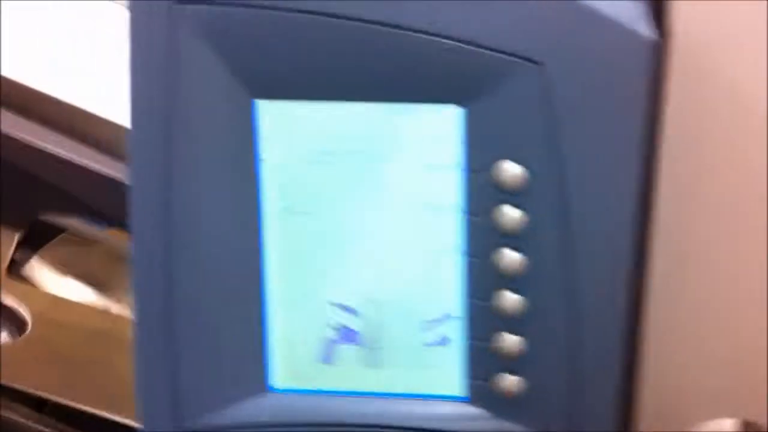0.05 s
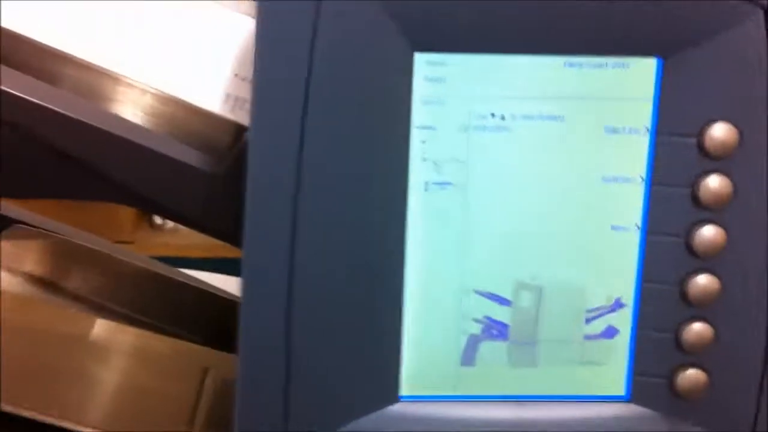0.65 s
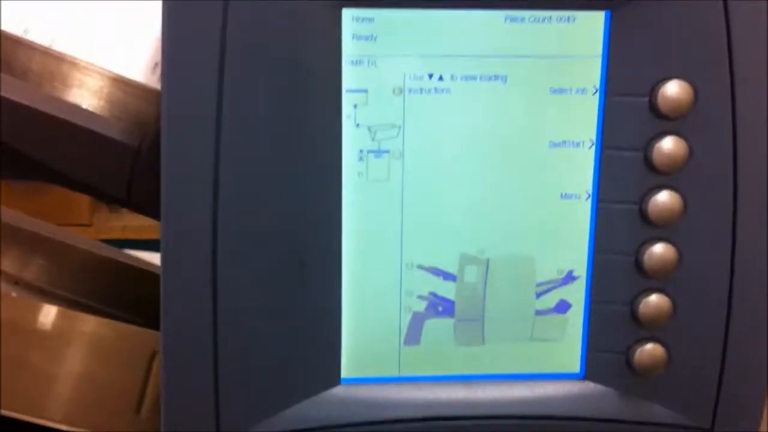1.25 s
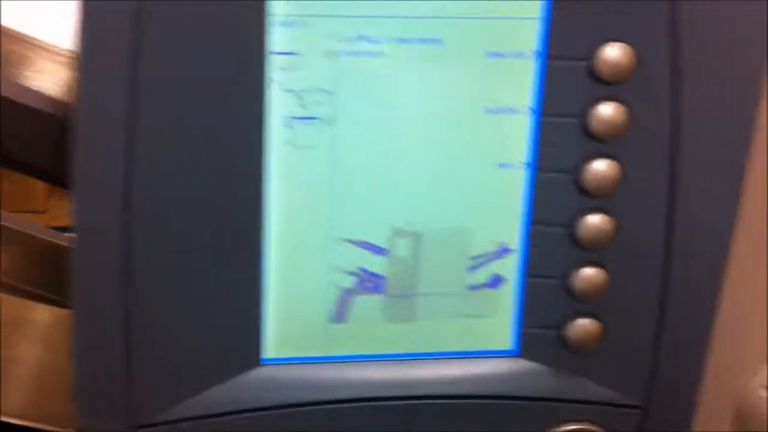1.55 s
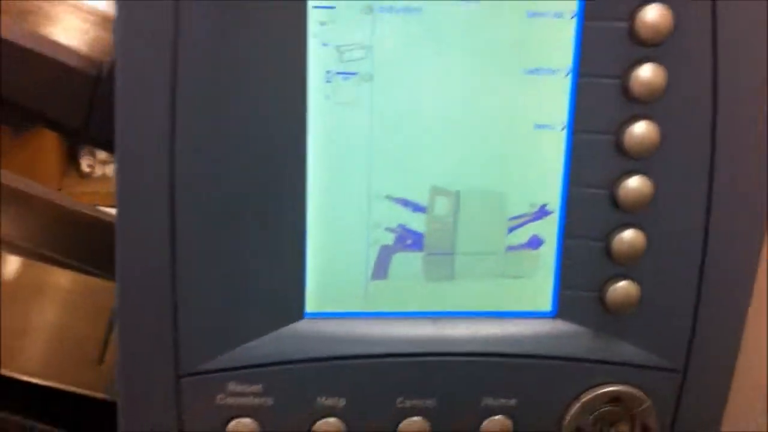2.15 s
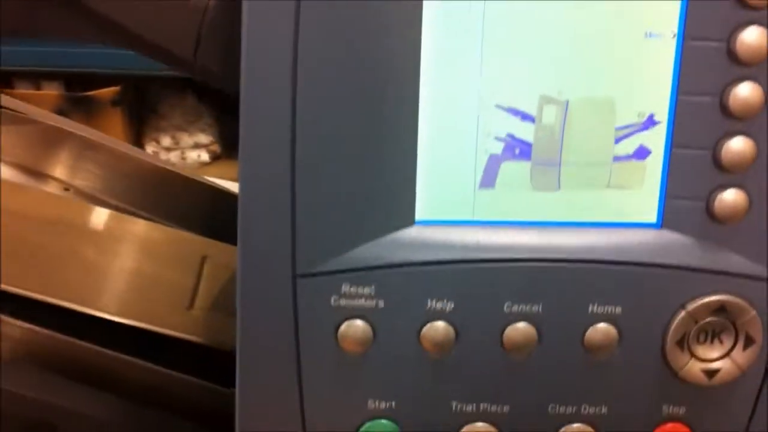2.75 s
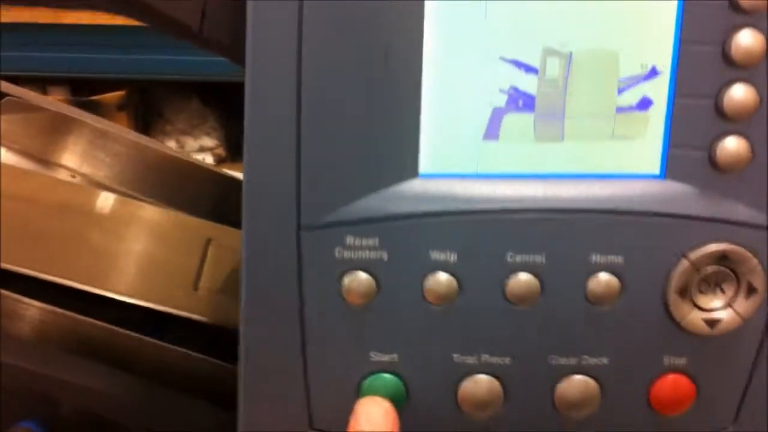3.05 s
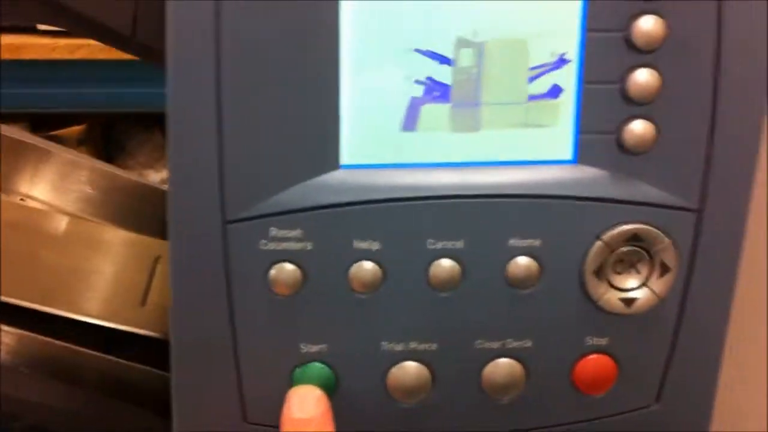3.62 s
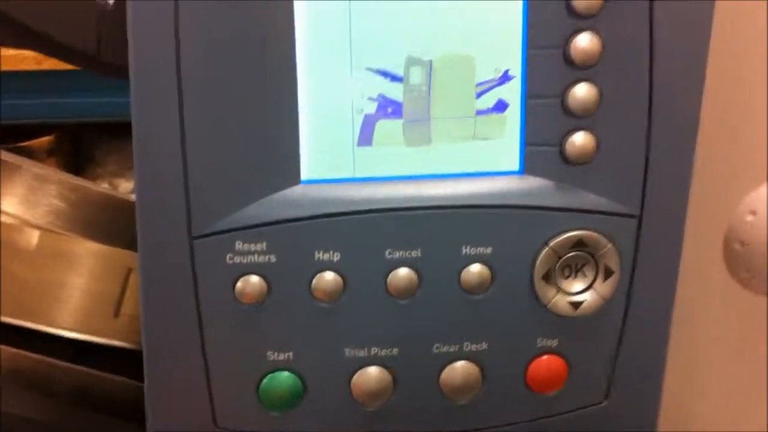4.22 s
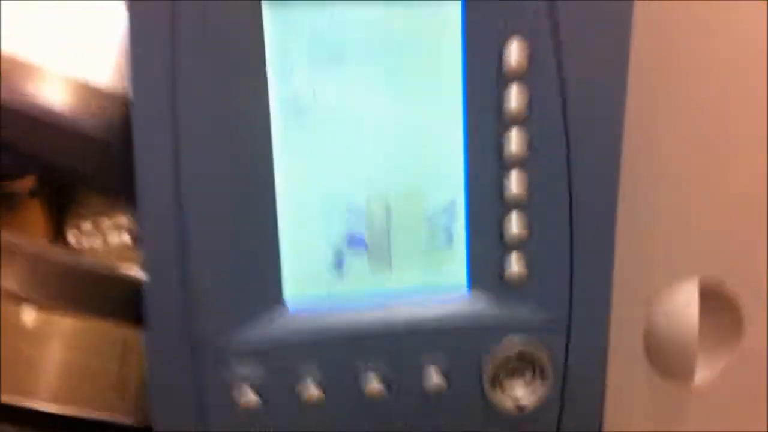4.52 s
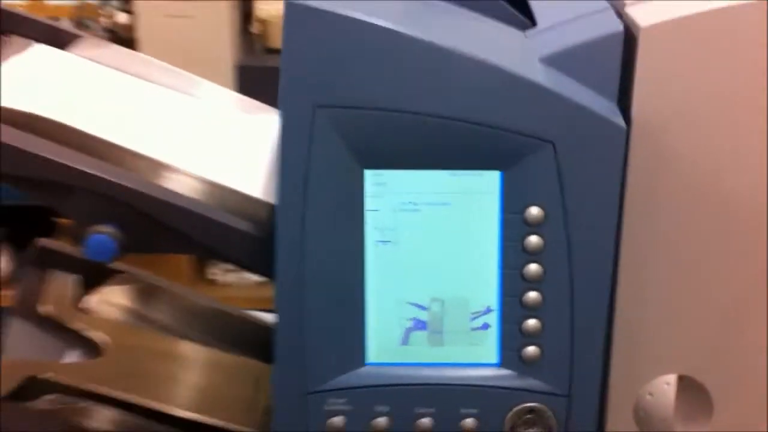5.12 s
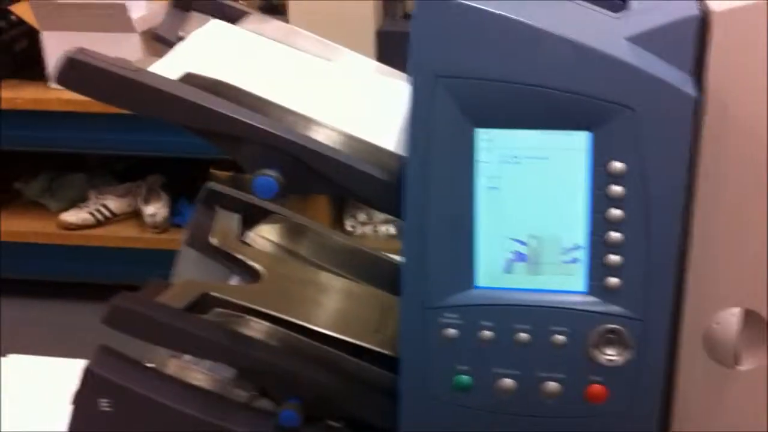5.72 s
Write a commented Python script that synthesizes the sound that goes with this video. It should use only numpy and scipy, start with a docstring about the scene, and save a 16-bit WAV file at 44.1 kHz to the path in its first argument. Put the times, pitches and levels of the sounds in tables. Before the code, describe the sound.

A paper folding machine starts up in a quiet office, its motor rumbling and gears chattering as sheets scrape through with sharp clacks.

```python
"""The motor of a folder inserter hums while its belts and rollers rattle the plastic housing.
Two sets of gears whine and chatter, sheets of paper scrape through the rollers, and the feed
mechanism clacks. It is heard from the control panel, in a quiet office. Before the machine starts
there are light knocks on its casing, tiny clicks, faint brushing and a distant tick,
then the snap of the start button."""
import sys
import numpy as np
from scipy import signal
from scipy.fft import rfft, irfft, next_fast_len
from scipy.io import wavfile
from scipy.ndimage import map_coordinates

SR = 44100
rng = np.random.default_rng(int(sys.argv[2]) if len(sys.argv) > 2 else 0)


def wrap_up_sound(samples):
    """Save the sound to the file named by the first command line argument, as 16-bit audio."""
    columns = np.atleast_2d(samples).T
    # keep every value between -1 and 1, then stretch to whole-number steps
    tamed = np.clip(columns, -1, 1)
    steps = np.round(tamed * 32767).astype(np.int16)
    wavfile.write(sys.argv[1], SR, steps)


N = 254898
T = np.arange(N) / SR  # the time of every sample, in seconds


# The tones of the hum. Each row: multiple of the shaft speed, relative level in dB while a sheet
# is fed in, and while it is carried on.
HUM_TONES = [(7, 0.5, -1.5), (8, 4, -1.5), (9.05, -5, 1.5)]
# How the housing and the rollers ring. Each row: pitch in Hz, width in Hz, relative level in dB.
HOUSING_RING = [(158, 25, -8.5), (204, 28.6, -4), (265.3, 30, -5.5)]
ROLLER_RING = [(324.3, 59, -1.5), (372.6, 46, 2), (433, 55, 0.5), (489, 44, 0), (584, 60, -5.5)]
# The deep noise in the rumble. Each row: frequency in Hz, relative level in dB.
BOOM_SPECTRUM = [(20, -22), (50, -23), (80, -15.5), (130, 1), (250, -3.5), (600, -25)]
# The rollers strain on a sheet in all rows but the last; the last row is a low thump near the end. Each row:
# start and length in # seconds, extra rumble and rattle in dB.
ROLLER_STRAINS = [(3.942, 0.056, 7, 2), (4.079, 0.07, 10, 4), (4.203, .035, 6, 2.5), (4.33, 0.078, 2, 8),
                  (4.458, 0.075, 1.5, 7.5), (4.92, .045, 6, 1), (5.012, 0.13, 8, 6), (5.15, .06, 1.5, 6.5),
                  (5.398, 0.064, 4, 5), (5.745, .08, 8.5, 4)]

def motor(turns, load_db, handover):
    """The motor hums; belts and rollers shake the housing, harder when they strain on a sheet."""
    shake_db = 0.11 * load_db
    rumble_db, rattle_db, hum_db = -40.5 + shake_db, -38 + shake_db, -38.5 + shake_db
    for start, length, extra_rumble_db, extra_rattle_db in ROLLER_STRAINS:
        straining = ramp(start, takes_s=0.031) - ramp(start + length, takes_s=0.031)
        rumble_db = rumble_db + extra_rumble_db * straining
        rattle_db = rattle_db + extra_rattle_db * straining
    hum = np.zeros(N)
    for multiple, feed_db, transport_db in HUM_TONES:
        level_db = feed_db + handover * (transport_db - feed_db)
        hum += amp(level_db) * shaft_tone(turns, multiple, slip=0.78, flutter_db=2)
    drone = shaft_tone(turns, 3.96, slip=1.0, flutter_db=1.5)  # where the housing rings most
    shake = unit(resonate(impacts(1200, spread_db=2), HOUSING_RING))
    boom = unit(coloured(rng.standard_normal(N), BOOM_SPECTRUM))
    rumble = unit(shake + amp(-4.5) * drone + amp(-12.5) * boom)
    throb = amp(1.5 * np.sin(np.pi * turns))  # the rollers turn at half the shaft speed
    rattle = unit(resonate(throb * impacts(1300, spread_db=3), ROLLER_RING))
    return amp(rumble_db) * rumble + amp(rattle_db) * rattle + amp(hum_db) * unit(hum)


HANDOVER_TAKES_S = 0.16  # how long the load takes to shift between the two sets of gears
# How each set of gears rings. Each row: pitch in Hz, width in Hz, relative level in dB.
FEED_GEAR_RING = [(698, 165, -4.5), (879, 138, -0.5), (975, 69, 1), (1072, 127, 0), (1255, 264, -9)]
TRANSPORT_GEAR_RING = [(868, 95, -2.5), (1000, 154, -1), (1146, 76, 1.5), (1277, 153, 2.5), (1370, 61, 4),
                       (1470, 180, -3.5)]

def gears(turns, load_db, handover):
    """Meshing teeth whine and chatter; most of the load shifts from feed gears to transport gears."""
    transport_share = 0.67 * handover
    backlash = amp(1.7 * np.sin(2 * np.pi * turns + wobble(11)))  # the chatter swells once a turn
    feed = unit(resonate(backlash * impacts(1500, spread_db=3), FEED_GEAR_RING))
    transport = unit(resonate(backlash * impacts(1500, spread_db=4), TRANSPORT_GEAR_RING))
    chatter = np.sqrt(1 - transport_share) * feed + np.sqrt(transport_share) * transport
    feed_teeth, transport_teeth = 20, 24
    feed_whine = shaft_tone(turns, feed_teeth, slip=0.64, flutter_db=1)
    transport_whine = handover * shaft_tone(turns, transport_teeth, slip=0.36, flutter_db=3.5)
    sheet_through = ramp(5.15, HANDOVER_TAKES_S)  # the transport gears ease off
    whine = amp(-40 - 2.5 * handover) * feed_whine + amp(-34.5 - 5 * sheet_through) * transport_whine
    return amp(-33.5 + 0.83 * load_db) * chatter + amp(0.5 * load_db) * whine


# Rollers pull a sheet. Each row: time of the peak in seconds, scrape level in dB, crisp edge
# in dB above the scrape, rise and decay in seconds.
SHEET_PULLS = [(3.96, -34, -12, 0.026, .08), (4.074, -31, -7, 0.072, .13), (4.34, -43.5, -1, 0.023, 0.53),
               (4.888, -33.5, -3.5, .01, 0.059), (5.026, -28.5, -5, 0.084, 0.094),
               (5.122, -21, -7.5, 0.015, 0.12), (5.184, -28, 1, 0.014, 0.014),
               (5.286, -31.5, -4, 0.019, .04), (5.38, -34, -7.5, .01, 0.27),
               (5.735, -23.5, -9.5, .055, .25), (5.736, -29, 2.5, .008, 0.027)]
# The scrape, and a crisp edge also used by clacks and clicks.
# Each row: frequency in Hz, relative level in dB.
SCRAPE_SPECTRUM = [(100, -51), (700, -19), (1400, 0), (1900, 0.5), (2700, -2.5), (4000, -5), (6000, -8),
                   (8000, -15), (10000, -14.5), (15000, -47)]
CRISP_SPECTRUM = [(300, -62), (3000, -38), (6000, 2), (8500, 1.5), (10500, -2.5), (12700, 1), (15700, -3.5)]
# Paper squeaks on rubber. Each row: time in seconds, pitch in Hz, level in dB.
PAPER_SQUEAKS = [(4.204, 12600, -37), (4.205, 9700, -40), (5.184, 12800, -25), (5.741, 6330, -22.5)]

def paper(turns):
    """Sheets slip in tiny catches, pressed unevenly by the rollers, and squeak now and then."""
    scrape_power, crisp_power = amp(-42) ** 2, amp(-50) ** 2  # paper gliding between pulls
    for time, db, edge_db, rise, decay in SHEET_PULLS:
        pull = amp(db) * swell(time, rise, decay)
        scrape_power = scrape_power + pull ** 2
        crisp_power = crisp_power + (amp(edge_db) * pull) ** 2
    grip = amp(0.75 * np.sin(4 * np.pi * turns) + 1.06 * wobble(60))
    scrape = coloured(grip * impacts(5000, spread_db=1), SCRAPE_SPECTRUM)
    scrape = unit(office(scrape, wet_db=-12))
    crisp = coloured(grip * impacts(4500, spread_db=-0.5), CRISP_SPECTRUM)
    crisp = unit(office(crisp, wet_db=-3))
    sheets = np.sqrt(scrape_power) * scrape + np.sqrt(crisp_power) * crisp
    for time, hz, db in PAPER_SQUEAKS:
        blip = amp(db - 4.3 * ((T - time) / 0.0041) ** 2)
        sheets += blip * np.sin(2 * np.pi * hz * T + wobble(600))
    return sheets


# The feed mechanism clacks. Each row: start in seconds, level in dB, sharp edge in dB above that.
FEED_CLACKS = [(3.953, -22, -12), (4.198, -33, 8), (4.334, -32, -1), (4.881, -25, -7), (5.022, -14.5, -8),
               (5.1135, -14, -11), (5.119, -7, -11), (5.375, -15.5, -8.5), (5.4218, -5, -18),
               (5.624, -27, 4), (5.671, -20, -5), (5.726, -25.5, 12)]
# How a lever rings. Each row: pitch in Hz, width in Hz, relative level in dB.
LEVER_RING = [(846, 145, 1.5), (1224, 135, 5), (1490, 170, 1), (1710, 300, -4), (2230, 210, -6),
              (2780, 260, -18.5), (3860, 650, -17.5)]
# The rollers take up a sheet. Each row: start in seconds, peak level in dB.
ROLLER_BUMPS = [(4.216, -31), (4.337, -23.5), (4.348, -26), (4.364, -29), (4.399, -28), (4.461, -27.5),
                (4.49, -27), (5.216, -25)]

def clacks():
    """Clutches and levers snap against their stops; the rubber rollers only bump."""
    track = np.zeros(N)
    for start, db, edge_db in FEED_CLACKS:
        body = peak(resonate(blow(t60=0.041, rattle_db=-25), LEVER_RING))
        edge = peak(coloured(blow(t60=0.039, rattle_db=-13), CRISP_SPECTRUM))
        add(track, start, amp(db) * office(body + amp(edge_db) * edge, wet_db=-6))
    for start, db in ROLLER_BUMPS:
        bump = peak(resonate(blow(t60=0.02, rattle_db=-33), ROLLER_RING))
        add(track, start, amp(db) * bump)
    return track


# The knocks. Each row: start in seconds, thud level in dB, then tick and ring in dB above the thud.
CASING_KNOCKS = [(0.072, -36.5, -24, -13), (0.102, -51, 0, -20), (0.132, -50, -15, -17),
                 (1.967, -58, 2, -30), (2.007, -54, -16, -20), (2.082, -57, 8.5, -28), (3.612, -58, 5, -30)]
# The thud and the tick of a knock. Each row: frequency in Hz, relative level in dB.
THUD_SPECTRUM = [(40, -41), (90, -22), (150, -2.5), (300, 2.5), (450, -3.5), (620, -16), (800, -15.5),
                 (1600, -27), (2500, -28), (5000, -51)]
TICK_SPECTRUM = [(100, -50), (500, -26), (1550, 9), (2300, -8), (3700, -5), (6000, -22), (14000, -30)]
# How the hollow casing rings. Each row: pitch in Hz, width in Hz, relative level in dB.
HOLLOW_RING = [(180, 16, -5), (225, 16, -4), (278, 16, 2), (447, 20, -11), (763, 24, -20)]

def knocks():
    """Light knocks on the plastic casing: a dull thud, a small tick and a hollow ring."""
    track = np.zeros(N)
    for start, db, tick_db, ring_db in CASING_KNOCKS:
        thud = peak(coloured(blow(t60=0.053, rattle_db=-32.5), THUD_SPECTRUM))
        tick = peak(coloured(blow(t60=0.02, rattle_db=-12), TICK_SPECTRUM))
        ring = peak(resonate(blow(t60=0.004, rattle_db=-35), HOLLOW_RING))
        knock = thud + amp(tick_db) * tick + amp(ring_db) * ring
        add(track, start, amp(db) * office(knock, wet_db=-3.5))
    return track


PRESS_S = 3.734  # when the button is pressed
# How the button rings. Each row: pitch in Hz, width in Hz, relative level in dB.
BUTTON_RING = [(180, 40, -8), (330, 35, 0), (515, 90, -5), (760, 160, -12), (1550, 250, -21)]

def button():
    """The start button snaps through and knocks against the panel."""
    track = np.zeros(N)
    knock = peak(resonate(blow(t60=0.046, rattle_db=-32), BUTTON_RING))
    snap = peak(resonate(blow(t60=0.04, rattle_db=-8), [(2800, 700, 0), (4100, 550, -2)]))
    add(track, PRESS_S, amp(-40) * office(knock + amp(-12) * snap, wet_db=-3))
    return track


# The clicks. Each row: start in seconds, peak level in dB.
PLASTIC_CLICKS = [(0.103, -41), (0.425, -46)]

def clicks():
    """Tiny dry clicks of plastic, close by."""
    track = np.zeros(N)
    for start, db in PLASTIC_CLICKS:
        click = peak(coloured(blow(t60=0.008, rattle_db=-14), CRISP_SPECTRUM))
        add(track, start, amp(db) * click)
    return track


# Soft swishes. Each row: time of the peak in seconds, level in dB, pitch and width in Hz,
# rise and decay in seconds.
BRUSH_SWISHES = [(.105, -58, 6760, 7000, 0.012, 0.091), (.353, -54, 1950, 500, 0.0094, 0.011),
                 (0.355, -59, 3000, 2200, 0.02, 0.011), (.37, -64.5, 2970, 3000, 0.02, 0.13),
                 (.665, -63.5, 418, 500, .015, 0.033), (1.15, -69, 780, 300, 0.14, 0.21),
                 (1.15, -73, 1850, 900, .1, 0.2)]

def brushing():
    """Faint brushing and rustling close by: bands of noise that swell and fade."""
    return sum(amp(db) * swell(time, rise, decay) * ringing_noise([(hz, width_hz, 0)])
               for time, db, hz, width_hz, rise, decay in BRUSH_SWISHES)


# How the whirr rings. Each row: pitch in Hz, width in Hz, relative level in dB.
WHIRR_RING = [(198, 120, -1), (450, 200, -1), (756, 220, -1), (1800, 900, -12)]

def whirr():
    """A soft whirr sets in as the button is pressed."""
    return amp(-64.5) * ramp(PRESS_S, takes_s=0.03) * ringing_noise(WHIRR_RING)


# How the distant tick rings. Each row: pitch in Hz, width in Hz, relative level in dB.
DISTANT_TICK_RING = [(2310, 400, -3), (3210, 580, -2.5), (4300, 460, -0.5), (5600, 1300, -6.5),
                     (7340, 1500, -7)]

def distant_tick():
    """A soft tick about once a second, blurred by the room."""
    ticking = sum(swell(time, rise=0.017, decay=0.1) for time in np.arange(0.704, T[-1], 1.003))
    return amp(-65) * ticking * ringing_noise(DISTANT_TICK_RING)


# The hush of the office. Each row: frequency in Hz, relative level in dB.
AIR_SPECTRUM = [(15, -42), (25, -18), (60, -19), (100, -12), (175, -2), (230, -3.5), (330, -3), (600, -10),
                (800, -7), (1150, -12.5), (1900, -15), (3100, -17), (10800, -20.5), (15700, -20)]

def still_air():
    """The office air makes a faint, almost steady hush."""
    return amp(-63.5 + 0.19 * wobble(4.1)) * unit(coloured(rng.standard_normal(N), AIR_SPECTRUM))


# The room's echo. Each row: frequency in Hz, seconds it takes to fade by 60 dB.
ECHO_TIMES = [(150, 0.47), (1000, 0.57), (5000, 0.38), (15000, 0.27)]

def office(x, wet_db):
    """Add the room's echo at a relative level of wet_db; its treble dies first."""
    hz, t, noise = signal.stft(rng.standard_normal(SR // 2), SR, nperseg=256)
    fade = amp(-60 * t / along(ECHO_TIMES, hz)[:, None])
    tail = signal.istft(noise * fade, SR, nperseg=256)[1]
    tail = np.pad(tail / np.linalg.norm(tail), (SR // 250, 0))  # arrives 4 ms late
    return x + amp(wet_db) * signal.fftconvolve(x, tail)[:len(x)]


def shaft_tone(turns, multiple, slip, flutter_db):
    """A tone at a multiple of the shaft speed; loose belts make its phase and strength wander."""
    return unit(amp(flutter_db * wobble(25)) * np.sin(2 * np.pi * multiple * turns + slip * wobble(22)))


def impacts(rate, spread_db):
    """Random tiny contacts, rate a second, of uneven force."""
    contacts = (rng.random(N) < rate / SR) * rng.choice([-1, 1], N)
    return contacts * amp(spread_db * np.clip(rng.standard_normal(N), -2, 2))


def blow(t60, rattle_db):
    """A single push, then chatter that fades by 60 dB in t60 seconds."""
    t = np.arange(SR // 2) / SR
    force = amp(rattle_db - 60 * t / t60) * rng.standard_normal(len(t))
    force[0] = 1
    return force


def ringing_noise(modes):
    """Steady noise that rings at the given pitches."""
    return unit(resonate(rng.standard_normal(N), modes))


def resonate(x, modes):
    """Make x ring at the given pitches, with little sound below the lowest."""
    def response(f):
        ring = sum((-1) ** k * amp(db) * 1j * f * width / (hz * hz - f * f + 1j * f * width)
                   for k, (hz, width, db) in enumerate(modes))
        bass_cut = 1j * f / (1j * f + modes[0][0])
        treble_cut = 1 / (1 + 0.5j * f / modes[-1][0])
        return ring * bass_cut * treble_cut
    return filtered(x, response)


def coloured(x, spectrum):
    """Shape x with a spectrum, using a filter that never rings ahead of the sound."""
    size = 2 ** 13
    gains = amp(along(spectrum, np.fft.rfftfreq(size, 1 / SR)))
    cepstrum = irfft(np.log(gains))
    cepstrum[1:size // 2] *= 2
    cepstrum[size // 2 + 1:] = 0
    impulse_response = irfft(np.exp(rfft(cepstrum)))
    return signal.fftconvolve(x, impulse_response)[:len(x)]


def filtered(x, response):
    """Multiply each frequency in x by response(frequency)."""
    size = next_fast_len(len(x) + SR // 4)
    return irfft(rfft(x, size) * response(np.fft.rfftfreq(size, 1 / SR)), size)[:len(x)]


def along(points, hz):
    """Read between (Hz, value) points on a log axis."""
    frequencies, values = np.transpose(points)
    return np.interp(np.log(hz + 1), np.log(frequencies + 1), values)


def curve(points):
    """Join (seconds, value) points with straight lines."""
    return np.interp(T, *np.transpose(points))


def wobble(rate):
    """A smooth curve drawn from rate random values a second."""
    return map_coordinates(rng.standard_normal(int(N * rate / SR) + 4), [T * rate], order=2)


def ramp(time, takes_s):
    """A change from 0 to 1, halfway at the given time."""
    return np.clip((T - time) / takes_s + 0.5, 0, 1)


def swell(time, rise, decay):
    """Grow to 1 at the given time, then die away."""
    return np.exp(-np.abs(T - time) / np.where(T < time, rise, decay))


def add(track, start, sound):
    """Mix a sound into a track, start seconds in."""
    part = track[max(round(start * SR), 0):][:len(sound)]
    part += sound[:len(part)]


def amp(db):
    """Turn decibels into a gain."""
    return 10 ** (np.asarray(db) / 20)


def unit(x):
    """Scale to an average strength (rms) of 1."""
    return x / np.sqrt(np.mean(x ** 2) + 1e-20)


def peak(x):
    """Scale to a peak of 1."""
    return x / np.max(np.abs(x))


# How fast the motor shaft spins. Each row: time in seconds, turns a second.
SHAFT_SPEED = [(3.92, 43.78), (4.02, 52.26), (4.5, 52.08), (4.7, 52.78), (5.1, 52.73), (5.3, 53.23),
               (5.55, 53.87), (5.78, 54.97)]
# How hard the drive works. Each row: time in seconds, relative load in dB.
DRIVE_LOAD = [(3.95, -0.5), (4.14, -0.5), (4.19, -7), (4.3, -6.5), (4.52, -1.5), (4.82, -2), (5.04, 5.5),
              (5.16, 3), (5.25, -0.5), (5.46, 0.5), (5.6, 0), (5.78, 2.5)]

def scene():
    """One shaft drives motor, gears and paper once the machine starts up in the quiet office."""
    switch_on_s, clutch_s, grab_s, idle_db = 3.926, 3.964, 0.015, -3.5
    turns = np.cumsum(curve(SHAFT_SPEED)) / SR
    load_db = curve(DRIVE_LOAD)
    load_db -= load_db[T > clutch_s].mean()  # 0 dB is now the average working load
    handover = ramp(4.64, HANDOVER_TAKES_S)  # 0 while a sheet is fed in, 1 while it is carried on
    idling = 1 - ramp(clutch_s, grab_s)  # quieter until the clutch grabs
    running = ramp(switch_on_s, grab_s) * amp(idle_db * idling)
    drive = motor(turns, load_db, handover) + gears(turns, load_db, handover) + paper(turns)
    machine = running * drive + clacks() + knocks() + clicks() + button()
    return machine + still_air() + whirr() + distant_tick() + brushing()


def record(dry):
    """Cut off the very highest treble."""
    return filtered(dry, lambda hz: hz < 15800)


dry = scene()
out = record(dry)
wrap_up_sound(out)
```